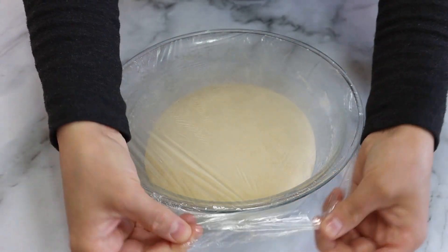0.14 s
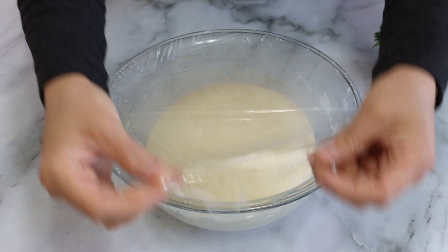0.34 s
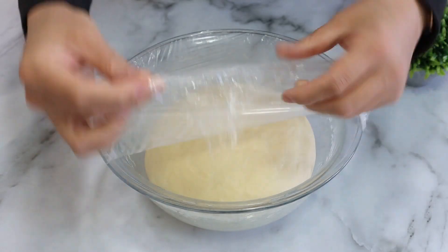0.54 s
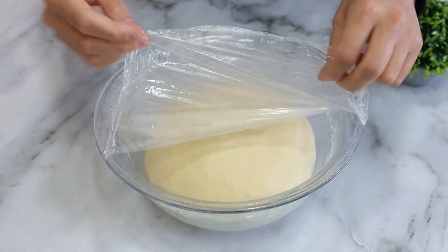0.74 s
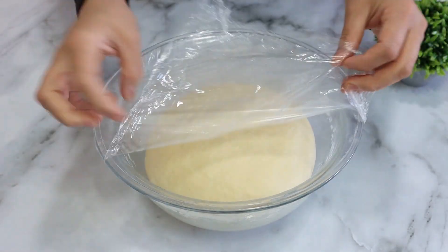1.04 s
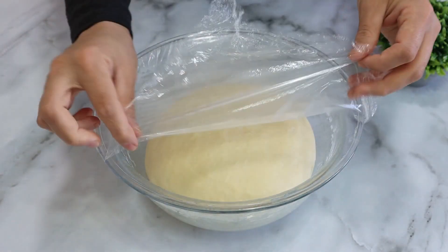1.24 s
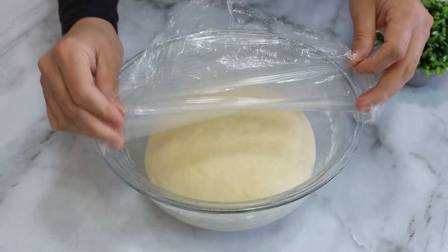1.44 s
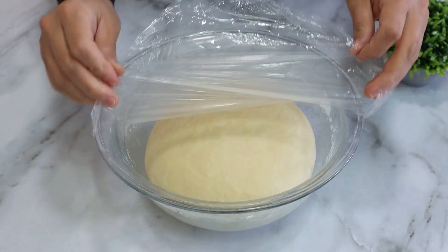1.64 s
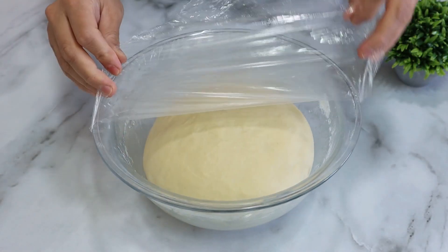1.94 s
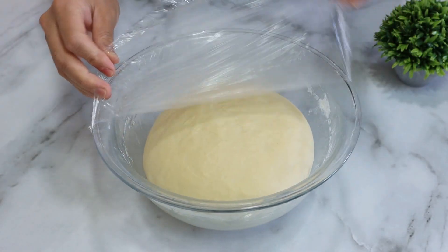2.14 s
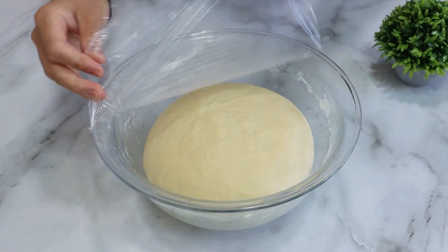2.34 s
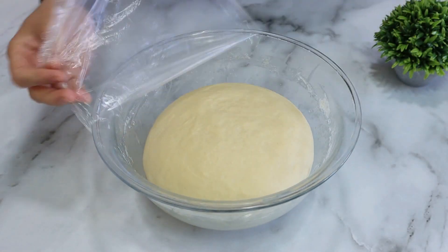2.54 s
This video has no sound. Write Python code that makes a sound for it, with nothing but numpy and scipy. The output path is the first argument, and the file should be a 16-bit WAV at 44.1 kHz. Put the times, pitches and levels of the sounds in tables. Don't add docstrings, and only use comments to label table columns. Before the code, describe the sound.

Cling film peeling from a glass bowl in three uneven pulls, with sharp crackly snaps and rustling

```python
import sys
import numpy as np
from scipy import signal
from scipy.io import wavfile
from scipy.ndimage import uniform_filter1d

SR = 44100
rng = np.random.default_rng(int(sys.argv[2]) if len(sys.argv) > 2 else 0)


def put_to_file(sound):
    columns = np.atleast_2d(sound).T
    safe = np.clip(columns, -1, 1)
    whole_steps = np.round(safe * 32767)
    wavfile.write(sys.argv[1], SR, whole_steps.astype(np.int16))


def field_ratio(decibels):
    return 10 ** (np.asarray(decibels, dtype=float) / 20)


N = 119070


def evened(x):
    return x / np.sqrt(np.mean(x ** 2) + 1e-20)


def smooth_noise(shape, first, second):
    return evened(uniform_filter1d(uniform_filter1d(rng.standard_normal(shape), first), second))


def read(points, hz):
    table_hz, value = np.transpose(points)
    return np.interp(np.log(hz + 1), np.log(table_hz + 1), value)


def along(table, col):
    rows = np.array(table)
    return np.interp(np.arange(N) / SR, rows[:, 0], rows[:, col])


def add(mix, s, sound):
    part = mix[round(s * SR):][:len(sound)]
    part += sound[:len(part)]


def coloured(x, points):
    log_gain = np.log(field_ratio(read(points, abs(np.fft.fftfreq(4096, 1 / SR)))))
    taps = np.fft.ifft(np.exp(np.conj(signal.hilbert(log_gain)))).real[:2048]
    return signal.oaconvolve(x, taps)[:N]


POP_CYCLES, RING_CYCLES = 1.5, 4


def pop(hz, cycles=POP_CYCLES):
    turns = np.arange(0, 5 * cycles / hz, 1 / SR) * hz
    fade = 2.6 / cycles
    return np.sin(2 * np.pi * turns) * turns * np.exp(1 - fade * turns) * fade


TICK_S = .0011


def tick(noise):
    t = np.arange(len(noise)) / SR / TICK_S
    fold_delay = 2 + int(3 * abs(noise[0]))
    doubled = noise + .8 * np.sign(noise[1]) * np.roll(noise, fold_delay)
    burst = doubled * np.minimum(3 * t + .1, 1) * np.exp(-t)
    return burst / abs(burst).max()


# (time [s], level [dB])
HANDLING = [(0, -63.5), (.12, -107), (.21, -45.5), (.36, -55.5), (.75, -84.5), (1.15, -84), (1.3, -58.5),
            (2.7, -62.5)]
# (pitch [Hz], level [dB per Hz])
RUMBLE_COLOUR = [(25, -40.5), (55, -8.5), (160, -6), (450, -5), (900, -44)]
# (pitch [Hz], level [dB per Hz])
AIR_COLOUR = [(40, -0.5), (300, -3.5), (1800, 8), (4000, -14), (12000, 1)]
AIR_DB, LUMP_DB = -77.5, 4.5


def background():
    lumps = smooth_noise(N, 1500, 1000)
    rumble = evened(coloured(rng.standard_normal(N) * field_ratio(LUMP_DB * lumps), RUMBLE_COLOUR))
    air = evened(coloured(rng.standard_normal(N), AIR_COLOUR))
    return field_ratio(along(HANDLING, 1)) * rumble + field_ratio(AIR_DB) * air


# (time [s], level
# [dB], pitch [Hz])
LOW_BUMPS = [(.165, -34.5, 320), (0.299, -36.5, 200), (.473, -38, 280), (1.642, -44.5, 240),
             (1.932, -43, 240), (.84, -74.5, 49.9), (1.46, -52.5, 55), (1.87, -58, 50), (2.04, -61, 49.7),
             (2.292, -63, 55), (2.51, -57.5, 50.5)]


def low_bumps():
    out = np.zeros(N)
    for s, db, hz in LOW_BUMPS:
        add(out, s, field_ratio(db) * pop(hz))
    return out


# (pitch [Hz], time to fall 60 dB [s])
KITCHEN = [(200, 0.45), (1500, 0.17), (12000, 0.1)]


def room(x):
    echoes = np.zeros(SR)
    at = np.arange(100, SR - 20, 20)
    echoes[at + rng.integers(0, 20, len(at))] = rng.choice([-1., 1.], len(at))
    hz, t, z = signal.stft(echoes, SR, nperseg=256)
    fade = field_ratio(-60 * t / read(KITCHEN, hz)[:, None])
    tail = signal.istft(z * fade, SR, nperseg=256)[1]
    return signal.fftconvolve(x, tail / np.linalg.norm(tail))[:N]


# (pitch [Hz], level [dB], time to fall 60 dB [s])
BOWL_TONES = [(240, -8.5, 0.23), (323.3, -11, .1), (512, -6, 0.41), (622, -9, 0.37), (810, -11, .1),
              (1316, -4, 0.054)]
# (time [s], pitch [Hz], level [dB], time to fall 60 dB [s])
FINGER_NUDGES = [(.474, 619, -37.5, 0.26), (.535, 518.2, -52, 0.89), (.665, 615.5, -51.5, 0.44),
                 (0.749, 1800, -42.5, 0.092), (.765, 1290, -40.5, 0.1), (0.864, 2420, -57.5, 0.19),
                 (.87, 1277, -66.5, 0.3), (1.159, 325, -61.5, 0.27), (1.182, 330, -50.5, 0.33),
                 (1.195, 2200, -76, 0.36), (1.235, 2200, -56, 0.21), (1.226, 380, -52.5, 0.45),
                 (1.250, 505, -51, 1.03), (1.830, 2430, -57.5, 1.2), (1.835, 510, -56, 0.32),
                 (2.014, 1750, -49, 0.11), (2.03, 510, -47, 0.16), (1.6, 810, -41, .3),
                 (1.4, 512, -53.5, 0.81), (2.06, 1220, -53.5, 0.37), (2.15, 512, -58, 0.93),
                 (2.24, 2110, -41, 0.27), (2.37, 600, -39, 0.28)]
BOWL_DB = -32.5


def bowl(drive):
    t, out = np.arange(SR // 2) / SR, np.zeros(N)
    ring = sum(field_ratio(db - 60 * t / t60) * np.sin(2 * np.pi * hz * t) for hz, db, t60 in BOWL_TONES)
    for s, hz, db, t60 in FINGER_NUDGES:
        waver = evened(uniform_filter1d(rng.standard_normal(len(t)), 500))
        rise = np.minimum(t / 0.0048, 1)
        damped = np.clip((.14 - t) / 0.037, 0, 1) ** (hz > 2300)
        tone = np.sin(2 * np.pi * hz * t + 0.35 * waver)
        add(out, s, rise * damped * field_ratio(db - 60 * t / t60 + 1.6 * waver) * tone)
    return out + field_ratio(BOWL_DB) * signal.fftconvolve(drive, 4 * ring / np.linalg.norm(ring))[:N]


# (time [s], rustle level [dB], crispness [dB])
HAND_PULL = [(0, -66.5, 5), (.12, -40, 2), (.3, -42, 2.5), (.5, -45, 0.5), (.6, -60, 3), (.86, -65.5, 4.5),
             (1.0, -96.5, 10.5), (1.22, -81.5, 8.5), (1.28, -56, 5), (1.5, -61.5, 8.5), (1.66, -45.5, 4),
             (1.9, -65, 4), (2.06, -63, 9.5), (2.2, -65, 17), (2.34, -46, 1.5), (2.42, -41.5, -3.5),
             (2.62, -81.5, 9), (2.7, -45, 3)]
STRIP_STARTS = [.078, .100, .162, .298, .327, .340, .397, .750, 1.255, 1.366, 1.415, 1.545, 1.581, 1.637,
                1.930, 2.018, 2.092, 2.233]
# (length [s], level above the rustle [dB], extra crispness [dB])
STRIPS = [(0.0081, 1.5, 5), (0.054, 4.5, -2.5), (0.034, 6, 5.5), (0.0045, 9, -4), (.012, 6.5, -4.5),
          (0.0039, 4, 5.5), (0.039, 8.5, 2.5), (0.03, 6, 1), (0.034, 5, 7), (0.012, 9, 2),
          (0.054, 16, -3.5), (0.025, -1.5, 9), (0.019, 9, 0.5), (0.0084, 1, 5.5), (0.018, 19.5, 1),
          (0.026, 10, -5.5), (0.021, 2.5, 4), (0.084, 10, -5)]
RISE_S, FADE_S = .004, 0.017


def effort():
    t, lift_db = np.arange(N) / SR, np.zeros((2, N))
    for s, (length, db, crisp_db) in zip(STRIP_STARTS, STRIPS):
        rise = np.clip((t - s) / RISE_S + .5, 0, 1)
        fade = np.exp(-np.maximum(t - s - length, 0) / FADE_S)
        lift_db += np.outer([db, db + crisp_db], rise * fade)
    crispness = np.outer([0, 1], along(HAND_PULL, 2) + 7)
    return field_ratio(along(HAND_PULL, 1) + lift_db + crispness)


# (time [s], pop pitch [Hz], lowest tick pitch [Hz], dull part of the tick [dB])
HANGING = [(0, 1185, 5930, -31), (.12, 1153, 5200, -19), (.5, 997, 5400, -9), (.62, 1512, 5400, -10.5),
           (.9, 1857, 5640, -38.5), (1.2, 2102, 9130, -44), (1.3, 1807, 7340, -41.5),
           (1.4, 1885, 6800, -14), (1.5, 1670, 7200, -14), (1.9, 1297, 7300, -8.5),
           (2.22, 1188, 7600, -19.5), (2.25, 1490, 4970, -2.5), (2.42, 820.7, 6300, -5.5),
           (2.6, 883, 8600, -4.5), (2.7, 1149, 6000, -10)]
POP_LOW_HZ, POP_HIGH_HZ, PITCH_SPREAD = 330, 3206, .55
CREASES_PER_S, SPREAD_DB, CLUMP_DB = 3000, 3.6, 1.4


def rustle():
    clump = smooth_noise(N, 300, 200)
    size = field_ratio(SPREAD_DB * np.minimum(rng.exponential(1, (2, N)), 4) + CLUMP_DB * clump)
    snapping = rng.random((2, N)) < CREASES_PER_S / SR
    size *= snapping * rng.choice([-1., 1.], (2, N))
    kind, noise = rng.integers(0, 20, N), rng.standard_normal((20, 300))
    pitches = np.geomspace(POP_LOW_HZ, POP_HIGH_HZ, len(noise))
    octaves = PITCH_SPREAD * np.minimum(rng.standard_normal(N), 1.4)
    taut = np.searchsorted(pitches[:-1], along(HANGING, 1) * 2 ** octaves)
    pops, ticks = np.zeros(N), np.zeros(N)
    for k, hz in enumerate(pitches):
        cycles = RING_CYCLES if k % 3 == 1 else POP_CYCLES
        pops += signal.oaconvolve(size[0] * (taut == k), pop(hz, cycles))[:N]
        ticks += signal.oaconvolve(size[1] * (kind == k), tick(noise[k]))[:N]
    return effort() * np.array([evened(pops), evened(ticks)])


# (time [s], tick peak [dB], pop peak [dB], pop pitch [Hz])
SNAPS = [(0.0229, -31, -45, 1430), (0.054, -25, -38.5, 1113), (0.0719, -28, -27, 1343),
         (0.0849, -44.5, -22, 980), (0.1301, -26.5, -21.5, 1268), (0.1359, -44.5, -19, 1002),
         (0.164, -21.5, -21, 1400), (0.1677, -31.5, -15, 1622), (0.1769, -31, -11.5, 1460),
         (0.1831, -10, -15, 1475), (0.2069, -34, -27, 926), (0.244, -22, -11.5, 1160),
         (0.2742, -16.5, -50.5, 1730), (0.2992, -24.5, -11, 1443), (0.3325, -32, -17.5, 1428),
         (0.3374, -33.5, -17, 1280), (0.3391, -34, -10.5, 1540), (0.3415, -10.5, -9, 1220),
         (0.3432, -13, -13, 1310), (0.3451, -12, -9, 998),
         (0.3835, -13, -10.5, 1020), (0.398, -28, -14.5, 1120), (0.4154, -19, -8, 1110),
           (0.4258, -26, -13, 1450), (0.4295, -6.5, -9.5, 1600), (0.4369, -26, -12, 1430),
           (0.4484, -31, -17, 1600), (0.4565, -19, -34, 1300), (0.473, -6.5, -7, 1040),
           (0.475, -13.5, -11, 1250), (0.489, -24, -51, 1420), (0.5186, -18.5, -21, 1900),
           (0.5582, -24, -34, 1410), (0.6121, -24.5, -40, 1500), (0.6679, -24.5, -32.5, 1580),
           (0.767, -19, -31.5, 1480), (0.866, -38, -36, 1780), (1.2219, -34.5, -63, 2100),
           (1.2336, -29.5, -61, 2080), (1.2419, -24, -47, 1500), (1.2572, -28, -35, 1490),
           (1.2701, -14, -32, 1800),
         (1.3854, -9.5, -31, 1500), (1.394, -16.5, -27.5, 1770), (1.4118, -21, -33, 1820),
           (1.4183, -10.5, -21.5, 2000), (1.426, -15, -44, 2010), (1.43, -9, -23, 2100),
           (1.4419, -7.5, -24, 2080), (1.452, -11, -24.5, 1950), (1.5332, -30, -37.5, 1850),
           (1.5471, -16.5, -37, 1840.0), (1.555, -24, -46, 1620), (1.5617, -16, -33, 2150),
           (1.5817, -5, -16, 2020), (1.594, -15, -20.5, 1720.0), (1.6351, -14.5, -37, 1550.0),
           (1.6449, -12.5, -12.5, 1440), (1.698, -16, -29.0, 1540), (1.709, -34, -24.5, 1000),
           (1.7383, -11.5, -48, 1940), (1.7644, -22, -25.5, 1540), (1.827, -22, -70, 1480),
         (1.9308, -18, -31.5, 1290), (2.027, -27.5, -38, 1510), (2.095, -33, -38, 1190.0),
           (2.2341, -11, -27, 1560), (2.2363, -21, -19.5, 1470), (2.269, -40, -22.5, 2000),
           (2.322, -35, -33, 1210), (2.348, -17.5, -53, 1860), (2.3671, -44, -20.5, 1800),
           (2.371, -21, -24.5, 1670), (2.679, -35, -44, 1000)]
POP_DB, TICK_DB = -4, 1.5


def snaps():
    rows = SNAPS
    pops, ticks = np.zeros((2, N))
    for s, tick_db, pop_db, hz in rows:
        noise = rng.standard_normal(300)
        add(pops, s, field_ratio(pop_db + POP_DB) * np.sign(noise[0]) * pop(hz))
        add(ticks, s, field_ratio(tick_db + TICK_DB) * tick(noise))
    return np.array([pops, ticks])


# (pitch [Hz], level [dB])
COUNTER_ECHO = [(3300, 0), (4200, -9.5), (5000, -2.5)]


def film():
    pops, ticks = snaps() + rustle()
    hz, t, z = signal.stft(ticks, SR, nperseg=128, noverlap=96)
    at = np.minimum(np.round(t * SR).astype(int), N - 1)
    lowest_hz, dull_db = along(HANGING, 2)[at], along(HANGING, 3)[at]
    bright = 1 / np.sqrt(1 + (lowest_hz / (hz[:, None] + 1)) ** 12)
    thinned = signal.istft(z * (bright + field_ratio(dull_db)), SR, nperseg=128, noverlap=96)[1][:N]
    return coloured(pops + thinned, COUNTER_ECHO)


# (pitch [Hz], level [dB])
MIC_COLOUR = [(200, -10), (1000, -1), (2100, 1), (4200, -1), (5700, -7), (10000, -7), (13300, 1.5),
              (15800, -11.5)]
# (pitch [Hz], level [dB])
CHANNEL_DIFFERENCE = [(40, -27.5), (300, -37), (1000, -42), (3000, -33), (8000, -34)]
ROOM_DB, TOUCH_DB = -9, -8


def scene():
    sheet = film()
    low = background() + low_bumps()
    touch = field_ratio(along(HANDLING, 1) + TOUCH_DB + 18) * rng.standard_normal(N)
    heard = coloured(sheet + field_ratio(ROOM_DB) * room(sheet), MIC_COLOUR)
    mid = heard + bowl(sheet + touch) + low
    side = coloured(np.roll(mid, 300), CHANNEL_DIFFERENCE)
    return np.array([mid + side, mid - side])


def low_pass(x):
    return signal.sosfilt(signal.butter(12, 16830, fs=SR, output="sos"), x)


TOP_HZ, SLIP_HZ, SLIP_RARITY, SIDE_DB = 15900, 9000, 1.45, 1


def record(dry):
    hz, t, z = signal.stft(dry, SR, nperseg=1024)
    chance = uniform_filter1d(rng.standard_normal(z.shape[1:]), size=24, axis=0)
    chance = evened(uniform_filter1d(chance, size=5, axis=1))
    slip = (uniform_filter1d(chance, size=8, axis=0) > SLIP_RARITY) & (hz[:, None] > SLIP_HZ)
    opposite = field_ratio(SIDE_DB) * np.array([1, -1])[:, None, None]
    slipped = signal.istft(z * np.where(slip, opposite, 1), SR, nperseg=1024)[1][:, :N]
    limited = signal.oaconvolve(slipped, signal.firwin(301, TOP_HZ, fs=SR)[None], "same")
    return low_pass(limited)


dry = scene()
out = record(dry)
put_to_file(out)
```